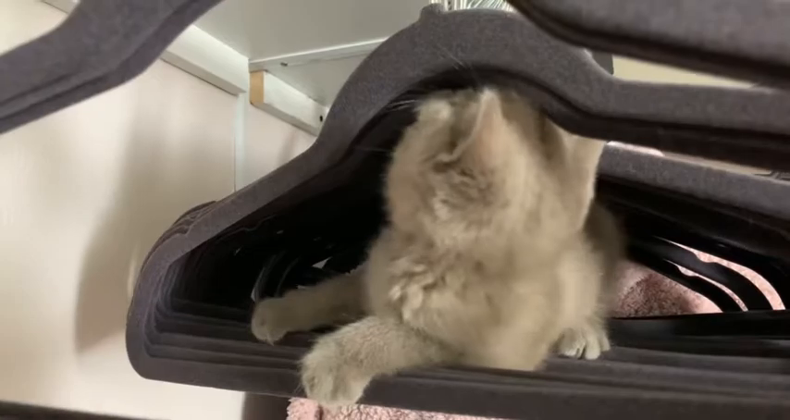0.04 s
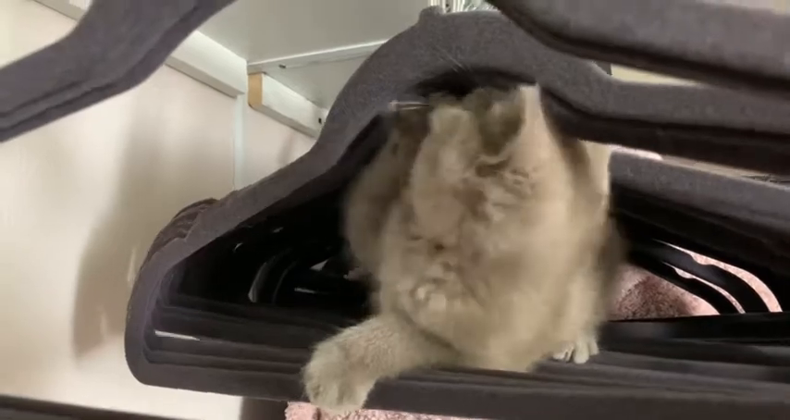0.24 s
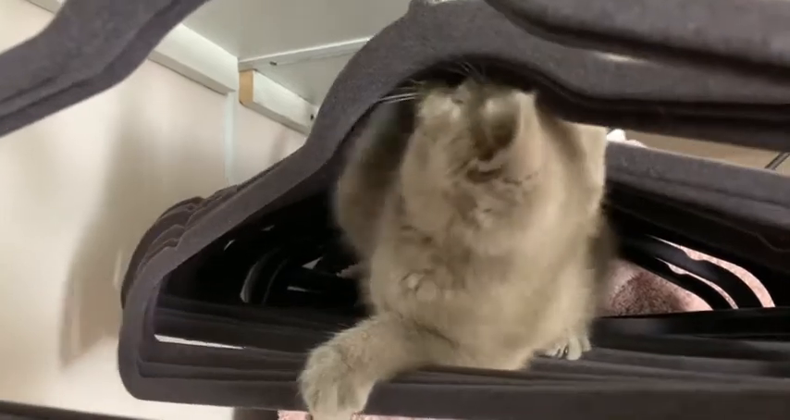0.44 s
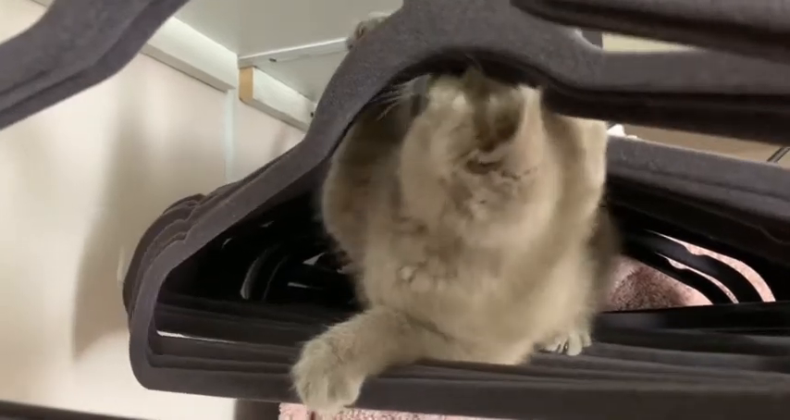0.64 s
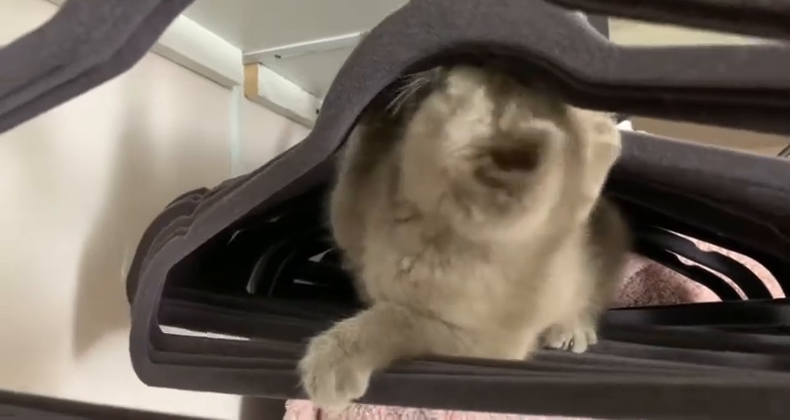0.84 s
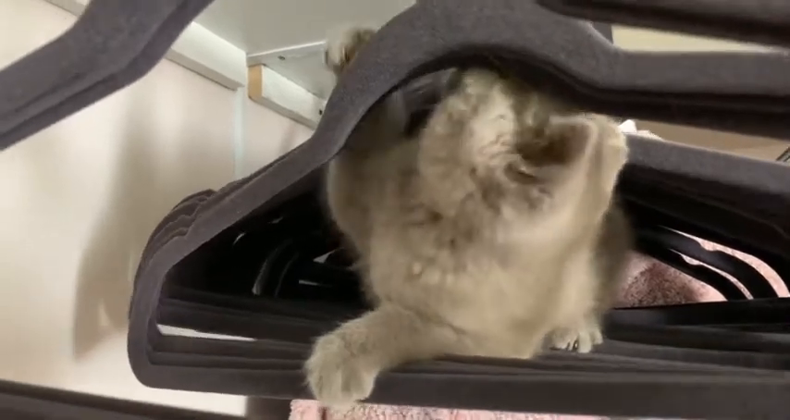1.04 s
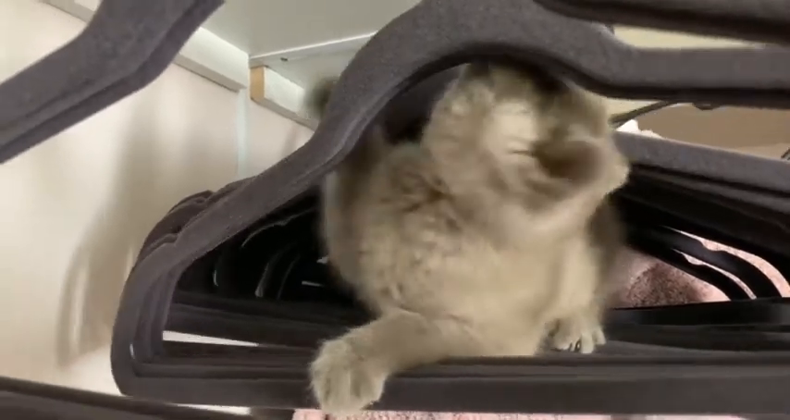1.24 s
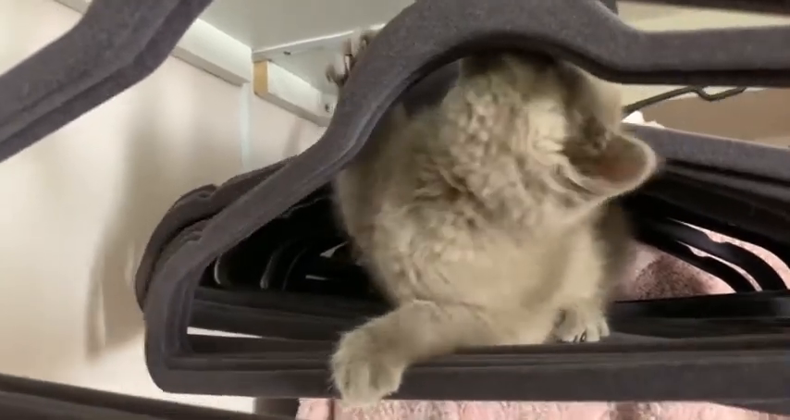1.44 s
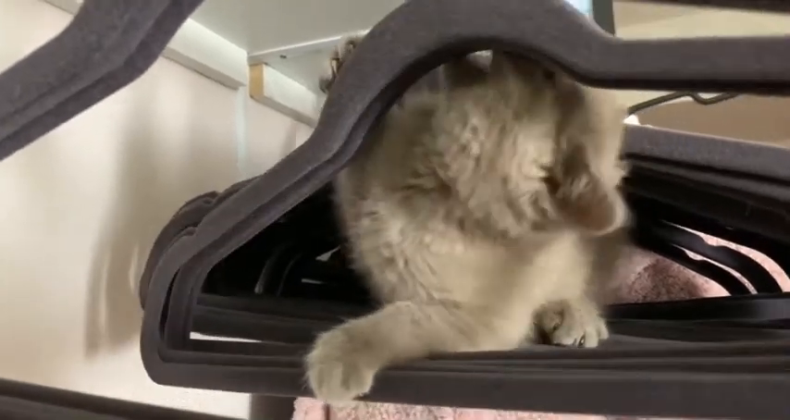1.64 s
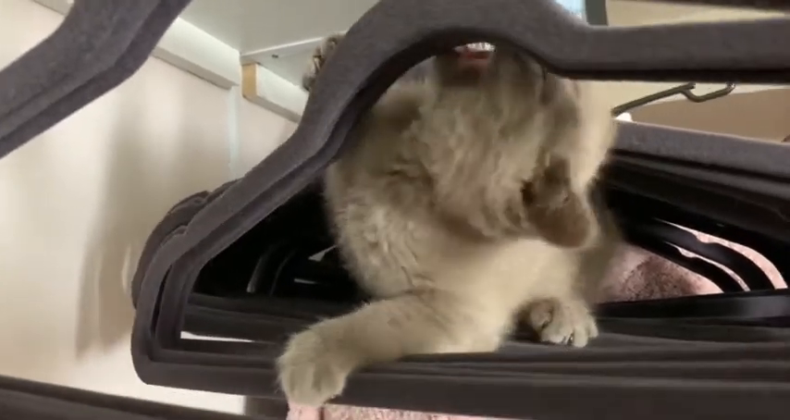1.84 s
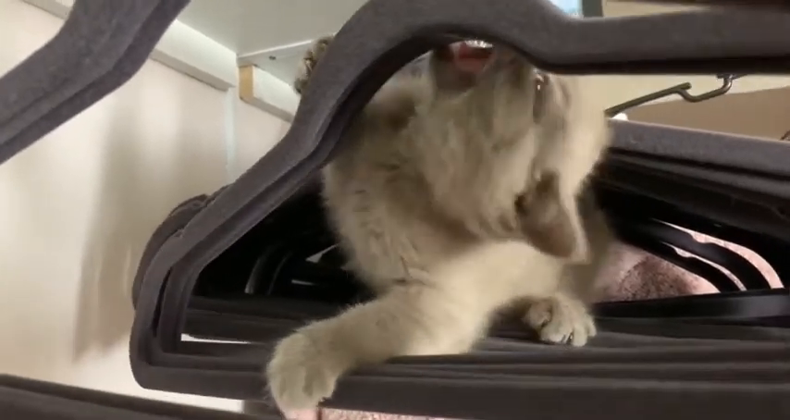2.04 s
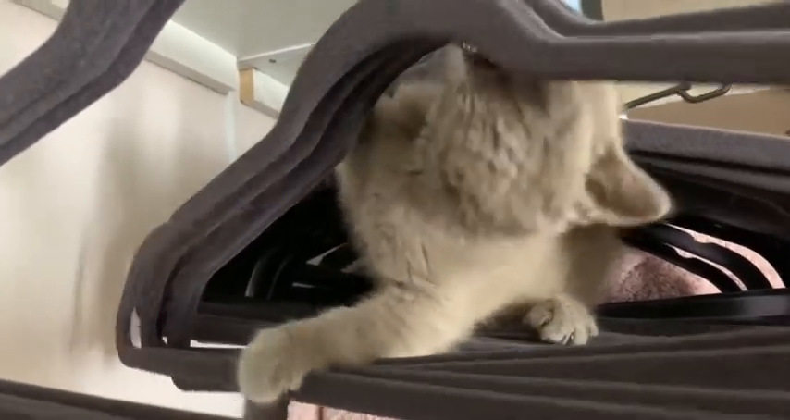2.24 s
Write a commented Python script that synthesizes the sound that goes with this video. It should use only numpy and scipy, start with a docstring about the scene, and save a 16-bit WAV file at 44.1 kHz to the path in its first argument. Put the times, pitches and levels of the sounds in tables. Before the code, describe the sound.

Clothes hangers clicking together close by, with two sharper knocks, as a cat moves on them.

```python
"""Clothes hangers with a velvety coat knock together close by as a cat shifts about on them in a closet.
Two sharp hits, a knock and then a snap, rattle the plastic frames and make a wire hook ring.
Lighter ticks and soft bumps fall around them, and fur brushes the velvety coat.
Behind it all are faint room noise and a low hum that slowly rises."""
import sys
import numpy as np
from scipy import signal
from scipy.fft import rfft, irfft
from scipy.io import wavfile
from scipy.ndimage import uniform_filter1d

SR = 44100
rng = np.random.default_rng(int(sys.argv[2]) if len(sys.argv) > 2 else 0)


def dump(signal):
    """Clip the signal to [-1, 1] and save it as 16-bit WAV at the path in sys.argv[1]."""
    limited = np.clip(np.atleast_2d(signal).T, -1, 1)
    pcm = np.round(limited * 32767).astype(np.int16)
    wavfile.write(sys.argv[1], SR, pcm)


N = 101429
T = np.arange(N) / SR

# A fade is the time to fall by 60 dB. Treble is the extra level above SPLIT_HZ.
# A colour lists how strong low and high pitches are in a noise, compared with each other.
# wire hooks touch, then knock (t/s, level/dB, treble/dB, fade/s); their colour (f/Hz, level/dB)
KNOCKS = [(.1956, -40.5, -1, 0.013), (.2011, -35.5, -2, 0.01), (.2066, -51, 11, .014),
          (.2150, -24, 8, 0.0082), (.2168, -18.5, -30, 0.013), (.2254, -44, 14.5, 0.0055)]
KNOCK_COLOUR = [(410, -70), (700, -48), (1050, -34), (2330, -52), (3110, -33), (3940, -24), (4800, -15),
                (5400, -53), (6830, 4.5), (7790, -8.5), (8310, -27), (9860, -12), (11100, 3.5),
                (11700, -18.5), (13000, -27), (15400, -18), (16000, -39)]
# a hanger snaps (t/s, level/dB, treble/dB, fade/s); its colour (f/Hz, level/dB)
SNAPS = [(1.0072, -21, 5, .0016), (1.0086, -21.5, -1, .0022), (1.0105, -35, -2, 0.007),
         (1.0194, -29, -12, 0.014)]
SNAP_COLOUR = [(410, -70), (700, -55), (1380, -30.5), (2880, -33), (4260, -18), (6480, -17), (7010, -13),
               (7890, -8), (8420, -24), (10800, 4), (12800, -26), (14800, -18), (16000, -9)]
# light ticks (t/s, level/dB, treble/dB, fade/s); their colour (f/Hz, level/dB)
TICKS = [(.1820, -54, 0, 0.024), (.1890, -62, -19, 0.026), (.3152, -44.5, -9, 0.048),
         (.3186, -45, -15, .008), (.3237, -48, -11, 0.0073), (.3250, -40, -10, 0.011),
         (.3311, -36.5, -11, 0.0028), (.3330, -36, 0, 0.0038), (.3415, -38.5, -17, 0.01),
         (.4840, -38, -20, 0.012), (.4893, -45, -2, 0.011), (.4941, -42, -5, 0.008),
         (.5593, -43.5, -0.5, 0.017), (.5648, -46, -11, 0.023), (.5686, -39, -0.5, 0.0056),
         (.5760, -50, -0.5, 0.079), (.6308, -56, -7, 0.017), (.7555, -61, 6, .012),
         (.7835, -55.5, -4, 0.031), (.8365, -56, -7, 0.17), (1.1712, -53, -10, 0.0066),
         (1.1757, -49, -8, 0.027), (1.1820, -47, -9, 0.018), (1.3298, -55, -4, .03),
         (1.3895, -43.5, -10, .015), (1.4238, -55.5, 0, .02), (2.0012, -49, -18, 0.014),
         (2.0185, -57.5, -1, 0.065), (2.2172, -48.5, 16, 0.0033), (2.2190, -50.5, 11, 0.0043),
         (2.2342, -51, 1, .003), (2.2356, -55.5, 13, .007), (2.2915, -66.5, 10.5, .06)]
TICK_COLOUR = [(600, -26), (1700, -15.5), (2800, -20), (3900, -21), (4800, -5), (5900, -8), (7100, 5),
               (8400, 2), (9500, -1), (10500, 7), (11700, 2.5), (13000, -26), (16000, -35)]
# dry clicks (t/s, level/dB, treble/dB, fade/s); their colour (f/Hz, level/dB)
CLICKS = [(.4423, -40, -8, .004), (.4518, -29.5, -6, 0.0045), (.4530, -43, -9, 0.017)]
CLICK_COLOUR = [(1000, -22), (3000, -16), (4800, -6), (7000, 6), (10000, 8), (12000, 4), (13500, -11),
                (16000, -16)]
# what rings on after each sharp hit (t/s, hook/dB, frame/dB, rattle/dB, rattle treble/dB)
RINGS = [(0.216, -48, -51.5, -40, -2.5), (1.0081, -64, -60, -41.5, 4)]
# notes of the wire hooks, whose close pairs waver, and of the frame (f/Hz, relative level/dB, fade/s)
HOOK_NOTES = [(4790, -0.5, .28), (4860, 5.5, 0.15), (5050, -16, .15), (6120, 0, 0.12), (6330, 0, 0.13),
              (6654, 1.5, 0.21), (6700, -6.5, .14), (7000, 2, 0.2), (7670, 4, .098), (7620, 5.5, 0.13),
              (8200, -18, 0.13), (9100, -1.5, 0.21), (9500, -4, 0.11), (10520, -12, 0.28), (11930, 2, 0.1),
              (11910, -6, .12), (15100, -4, 0.097)]
FRAME_NOTES = [(800, -5.5, 0.098), (907, -11, 0.15), (1036, -18, 0.11), (1202, -5, 0.065),
               (1380, -32, 0.098), (1660, -1, 0.097), (2724, -3.5, 0.063)]
# colour of the neighbours rattling (f/Hz, level/dB)
RATTLE_COLOUR = [(180, -47), (300, -3.5), (603, -30), (961, -8.5), (1480, -15), (1660, -7.5), (2880, -15),
                 (4750, 2), (5340, -13), (6960, 0.5), (8640, -23), (10000, 5.5), (12700, -15), (15200, -11),
                 (16000, -26)]
# taps that each ring one note of a hanger (t/s, f/Hz, level/dB, fade/s)
PINGS = [(0.5595, 5600, -42, 0.016), (0.836, 4310, -58, 0.078), (1.0076, 4205, -37, 0.0089),
         (1.0087, 5810, -41, .009), (1.013, 5076, -48, .025), (1.0107, 9400, -33, 0.012),
         (1.012, 9480, -52, .13), (1.019, 6670, -34.5, 0.014), (1.021, 4350, -52, .04),
         (1.3888, 3310, -51, 0.039), (1.3887, 6350, -46.5, 0.019), (2.018, 3150, -55.5, 0.033),
         (2.2186, 4840, -55, 0.047), (2.2348, 4460, -59, 0.032), (2.213, 3616, -59, .03),
         (2.2188, 11200, -39.5, .012)]
# colour of a scraping frame (f/Hz, level/dB)
SCRAPE_COLOUR = [(600, -16), (850, -8), (1050, -3), (1400, -17), (2200, -20.5), (4300, -11), (6000, -18),
                 (12000, -47)]
# dull clacks of the frames (t/s, level/dB); their colour (f/Hz, level/dB)
CLACKS = [(0.217, -65), (0.316, -64), (.331, -65), (0.453, -63), (.483, -63.5), (.493, -68), (0.561, -55.5),
          (0.838, -60), (1.008, -59), (1.179, -60), (1.328, -64), (1.390, -61), (1.424, -61.5),
          (2.02, -60.5), (2.218, -65)]
CLACK_COLOUR = [(300, -22), (650, 4), (1000, 4), (1500, 0), (2300, 3), (3200, 5), (4500, 3), (7000, -20)]
# soft bumps against the row (t/s, f/Hz, level/dB, fade/s)
BUMPS = [(0.217, 239, -60.5, 0.22), (.51, 104, -58, .16), (0.566, 203.5, -55, 0.18), (.59, 102, -57, 0.16),
         (.662, 82, -48, 0.08), (1.03, 205, -59, 0.22), (1.04, 110, -57, .3), (1.075, 58, -55.5, .4),
         (1.868, 146, -47, 0.064)]
# pats of paws and body (t/s, level/dB); their colour (f/Hz, level/dB)
PATS = [(0.488, -60), (.578, -53.5), (0.661, -60), (1.864, -50.5), (2.083, -53.5), (2.281, -54.5)]
PAT_COLOUR = [(70, 2), (110, 1.5), (200, -14), (290, -19.5), (420, -13.5), (600, -23), (1200, -55),
              (4000, -62)]
# loudness of the brushing fur (t/s, level/dB); its colour (f/Hz, level/dB)
FUR_STROKES = [(0, -70), (.035, -61), (.08, -66), (.165, -64.5), (.205, -49), (.29, -66), (.42, -70.5),
               (.51, -63), (.61, -67), (.70, -73.5), (.77, -67), (.82, -68), (.87, -65.5), (.95, -57),
               (1.0, -54.5), (1.04, -58.5), (1.08, -69), (1.16, -71), (1.205, -64), (1.27, -69),
               (1.35, -62), (1.41, -63), (1.46, -68), (1.85, -68.5), (2.0, -62.5), (2.06, -64),
               (2.3, -62.5)]
FUR_COLOUR = [(800, -8.5), (2500, -14), (5000, -7.5), (6500, -3.5), (8000, 1), (10000, -3.5), (12000, -2),
              (13200, -27), (16000, -19.5)]
# colour of the room's rumble and hiss (f/Hz, level/dB)
ROOM_COLOUR = [(20, -1.5), (32, 0), (46, 3.5), (62, 1.5), (85, -2), (115, -2.5), (155, -11), (230, -14),
               (330, -17), (600, -20.5), (950, -23.5), (2300, -27), (3700, -29.5), (7700, -37.5),
               (11800, -32), (13300, -44), (16000, -76)]
# path of the low hum (t/s, f/Hz, level/dB)
HUM = [(0, 107.8, -77.5), (1.1, 112.7, -76), (1.35, 116, -65), (1.701, 121.9, -63), (2.0, 126.3, -60.5),
       (2.3, 126.2, -59)]

SPLIT_HZ, TOP_HZ = 8840, 15900


def knocks():
    """Wire hooks touch lightly, then knock hard."""
    return contacts(KNOCKS, KNOCK_COLOUR, attack_s=0.00028, hold_s=0.00074)


def snap():
    """A hanger slips free and snaps against its neighbour."""
    return contacts(SNAPS, SNAP_COLOUR, attack_s=0.00025, hold_s=0.0006)


def ticks():
    """One hanger taps lightly on another."""
    return contacts(TICKS, TICK_COLOUR, attack_s=0.00025, hold_s=0.00037)


def clicks():
    """Edge meets edge with a thin, dry click."""
    return contacts(CLICKS, CLICK_COLOUR, attack_s=0.00034, hold_s=0.00016)


def ringing(attack_s=0.00028):
    """The struck hook and frame ring on while their neighbours rattle."""
    low, high = split(noise(RATTLE_COLOUR))
    out = sum(ring([(hz, db, fade)], t, attack_s) for t, hz, db, fade in PINGS)
    chatter = grains(spread_db=3, length_s=0.004)  # the hooks keep touching as they ring
    for t, hook_db, frame_db, rattle_db, treble_db in RINGS:
        out += amp(hook_db) * chatter * ring(HOOK_NOTES, t, attack_s)
        out += amp(frame_db) * ring(FRAME_NOTES, t, attack_s=0.0044)
        rattle = low + amp(treble_db) * high
        out += amp(rattle_db) * envelope(t, attack_s, fade_s=0.1) * rattle
    return out


def scrape():
    """A frame scrapes along its neighbour, leading into the first knock."""
    rough = noise(SCRAPE_COLOUR) * grains(spread_db=5, length_s=0.0015)
    return amp(-56) * rough * envelope(0.1664, attack_s=0.047, fade_s=0.12)


def clacks():
    """The frames give dull clacks as the row shifts."""
    loudness = sum(amp(db) * envelope(t, attack_s=0.00096, fade_s=0.076) for t, db in CLACKS)
    return noise(CLACK_COLOUR) * loudness


def bumps():
    """Soft bumps sway the row under the cat's weight, each with one low note."""
    out = np.zeros(N)
    for t, hz, db, fade in BUMPS:
        note = np.sin(2 * np.pi * hz * (T - t))
        out += amp(db) * envelope(t, attack_s=0.0035, fade_s=fade) * note
    return out


def pats():
    """Paws and body land with muffled pats."""
    loudness = sum(amp(db) * envelope(t, attack_s=0.0089, fade_s=0.048) for t, db in PATS)
    return noise(PAT_COLOUR) * loudness


def fur():
    """Fur rubs the velvety coat: a fine hiss that swells with each stroke."""
    t, db = np.array(FUR_STROKES).T
    return noise(FUR_COLOUR) * amp(np.interp(T, t, db)) * grains(spread_db=1.03, length_s=0.016)


def closet(sound):
    """Add a short blur of echoes from the walls and clothes."""
    tail = rng.standard_normal(N) * envelope(0.00073, attack_s=0.0015, fade_s=0.05)
    echoes = signal.fftconvolve(sound, tail / np.linalg.norm(tail))[:N]
    return sound + amp(-10) * echoes


def room():
    """The room rumbles and hisses, faint and steady."""
    return amp(-61) * noise(ROOM_COLOUR)


def hum():
    """A low hum with a faint octave above it grows louder and creeps up in pitch."""
    t, hz, db = np.array(HUM).T
    phase = 2 * np.pi * np.cumsum(np.interp(T, t, hz)) / SR
    tone = np.sin(phase) + amp(-27.5) * np.sin(2 * phase)
    return np.sqrt(2) * amp(np.interp(T, t, db)) * tone


def contacts(rows, colour, attack_s, hold_s):
    """Each touch starts so many short notes at once that they sound like a burst of noise."""
    hiss = noise(colour)
    loudness = np.sqrt(uniform_filter1d(hiss * hiss, size=64))
    low, high = split(hiss / loudness)  # evened out, so even tiny bursts keep their strength
    return sum(amp(db) * envelope(t, attack_s, fade, hold_s) * (low + amp(treble_db) * high)
               for t, db, treble_db, fade in rows)


def ring(notes, start_s, attack_s):
    """The fading notes of something struck once."""
    return sum(amp(db) * envelope(start_s, attack_s, fade) * np.sin(2 * np.pi * (hz * T + rng.random()))
               for hz, db, fade in notes)


def grains(spread_db, length_s):
    """The random flicker in loudness of a surface that catches and slips."""
    wobble = uniform_filter1d(rng.standard_normal(N), max(int(length_s * SR), 1))
    gain = amp(spread_db * np.clip(wobble / wobble.std(), -2, 2))
    return gain / np.sqrt(np.mean(gain ** 2))


def noise(colour):
    """Noise of the given colour, scaled to a strength (rms) of 1."""
    hz, db = np.array(colour, float).T
    f = np.maximum(np.arange(N // 2 + 1) * SR / N, 1)
    shape = amp(np.interp(np.log(f), np.log(hz), db))
    bass_cut = np.minimum(f / hz[0], 1) ** 2
    shaped = irfft(rfft(rng.standard_normal(N)) * shape * bass_cut, N)
    return shaped / shaped.std()


def envelope(start_s, attack_s, fade_s, hold_s=0):
    """Loudness over time: rise during the attack, hold, then die away."""
    age = T - start_s
    rise = np.clip(age / attack_s, 0, 1)
    fall = np.log(1000) * np.maximum(age - attack_s - hold_s, 0) / fade_s
    return rise * np.exp(-np.minimum(fall, 20))


def split(sound):
    """The part of a sound below SPLIT_HZ, and the rest."""
    low = signal.sosfiltfilt(signal.butter(4, SPLIT_HZ, fs=SR, output="sos"), sound)
    return low, sound - low


def amp(db):
    """Turn decibels into a number to multiply by."""
    return 10 ** (np.asarray(db) / 20)


def scene():
    """Hangers, cat and room in one channel; only the ticks get the closet's echoes."""
    hits = knocks() + snap()
    light_ticks = ticks()
    hangers = hits + clicks() + ringing() + closet(light_ticks) + scrape() + clacks() + bumps()
    cat = pats() + fur()
    return (hangers + cat + room() + hum())[None]


def record(dry):
    """Cut away the treble above TOP_HZ."""
    return signal.sosfilt(signal.ellip(8, .2, 70, TOP_HZ, fs=SR, output="sos"), dry)


dry = scene()
out = record(dry)
dump(out)
```